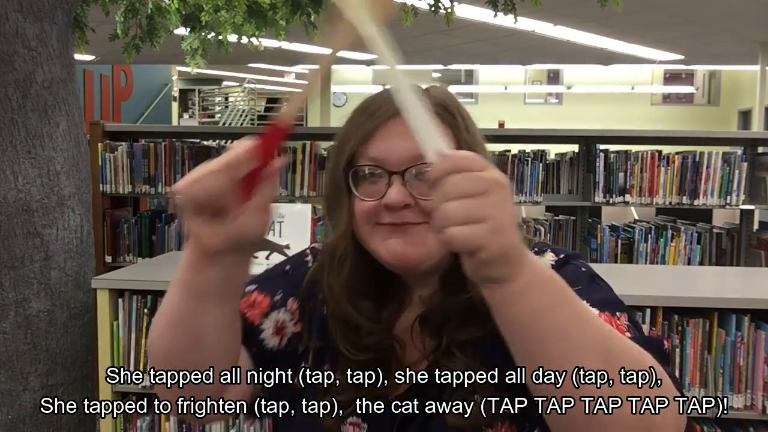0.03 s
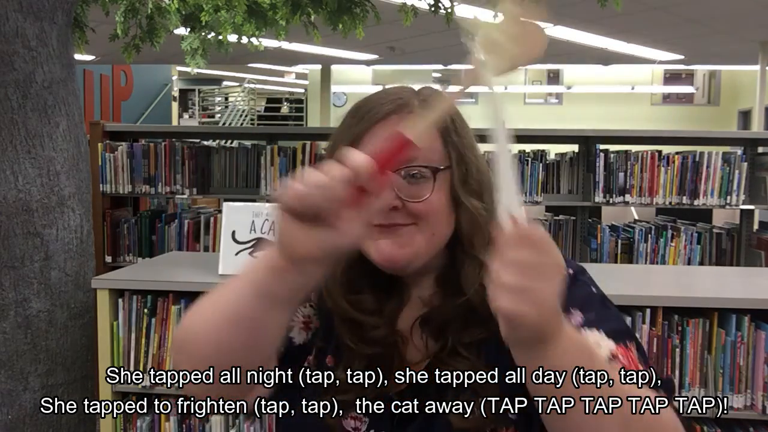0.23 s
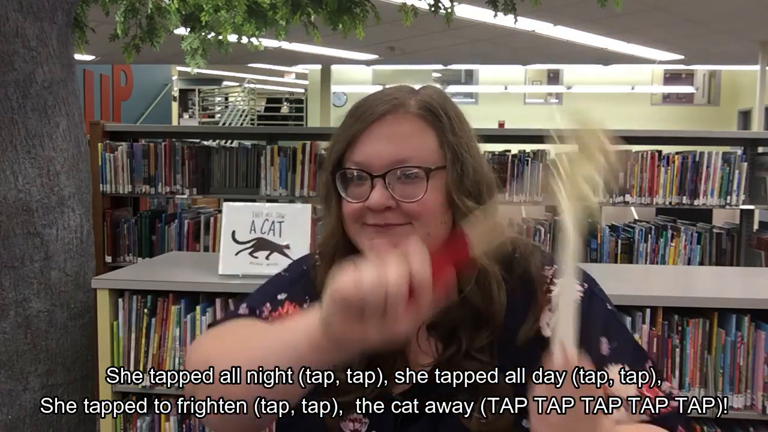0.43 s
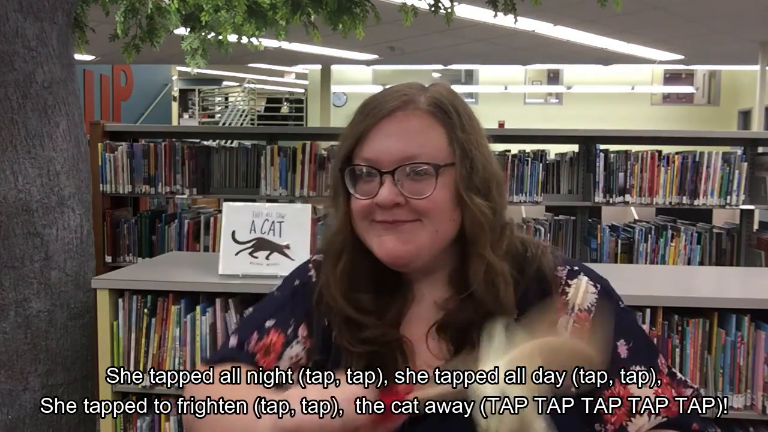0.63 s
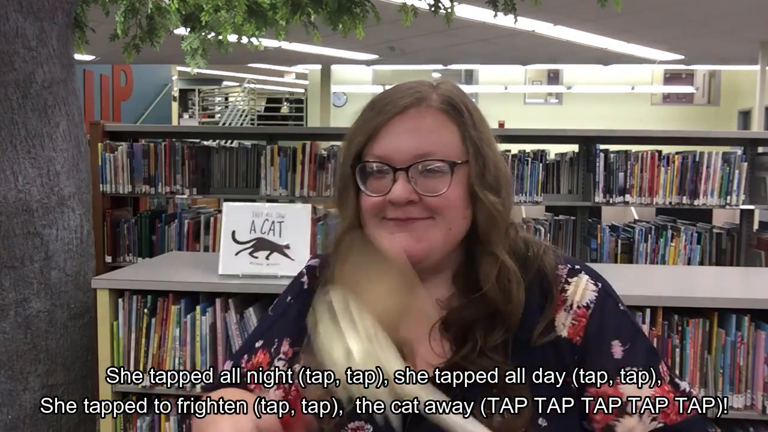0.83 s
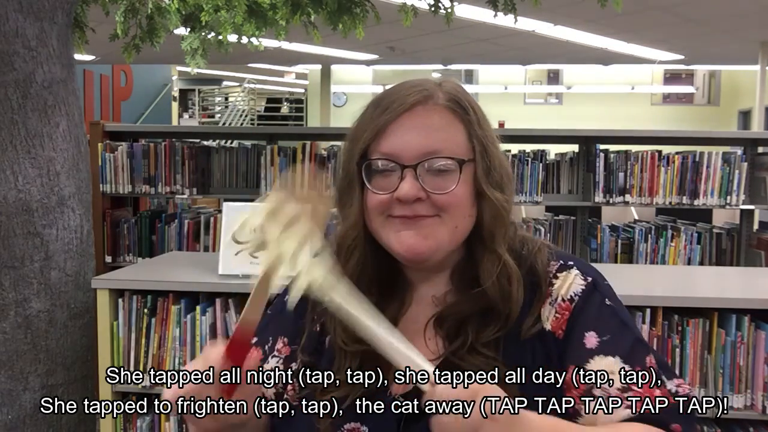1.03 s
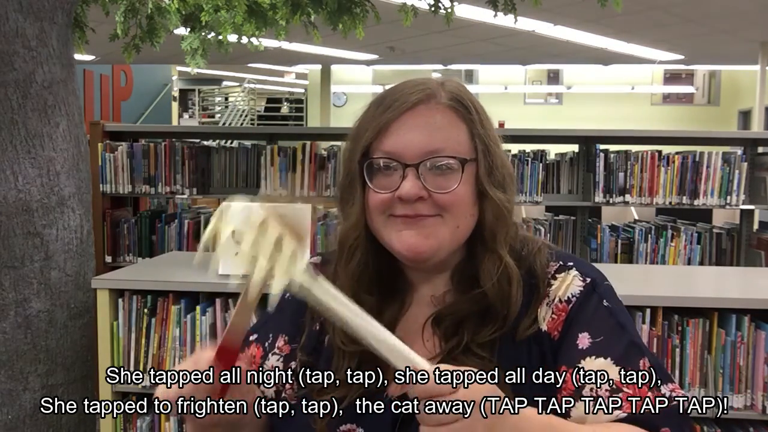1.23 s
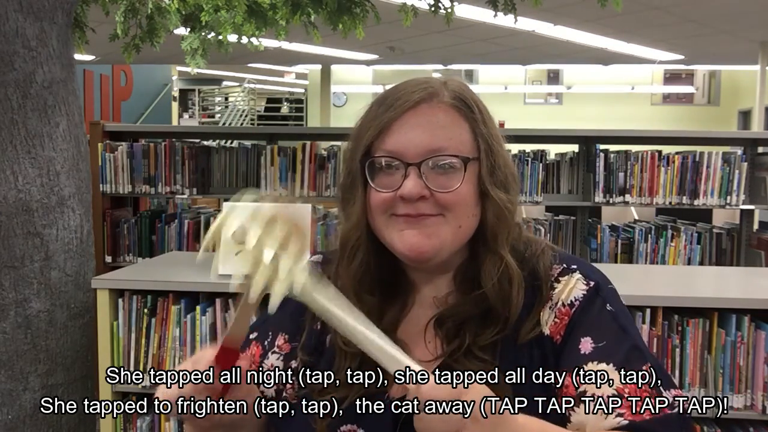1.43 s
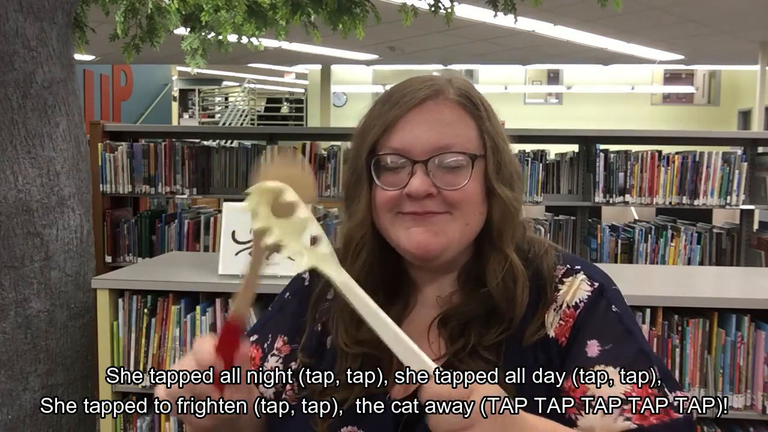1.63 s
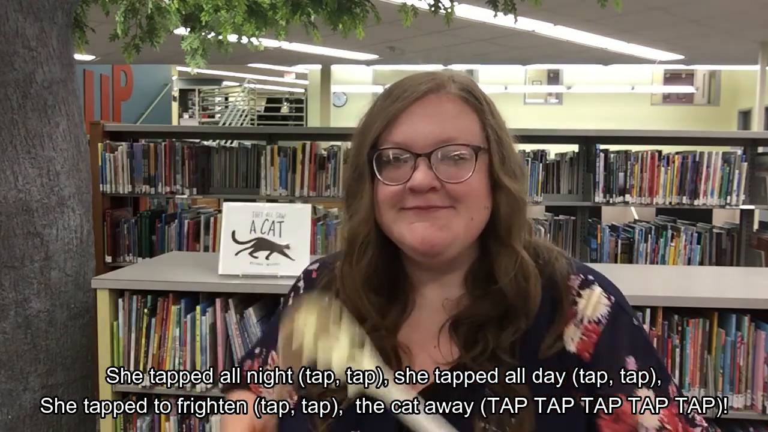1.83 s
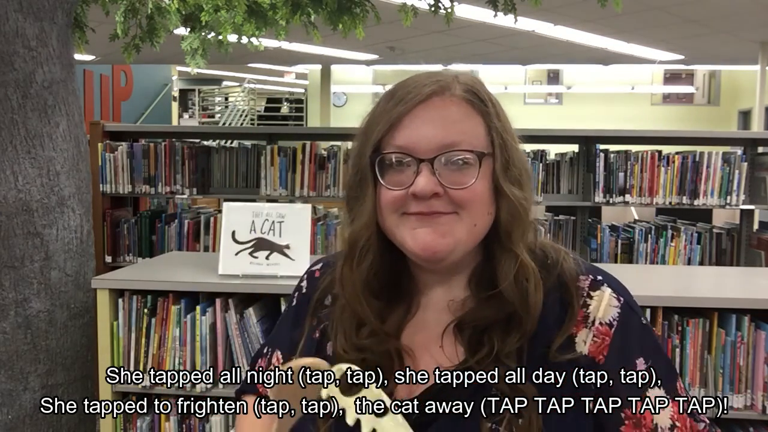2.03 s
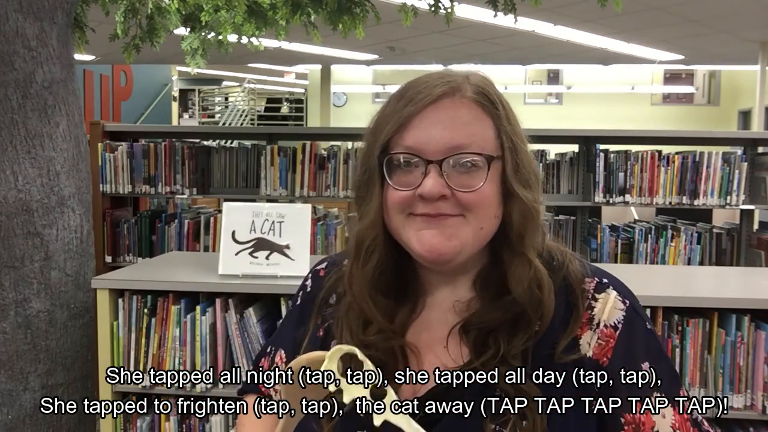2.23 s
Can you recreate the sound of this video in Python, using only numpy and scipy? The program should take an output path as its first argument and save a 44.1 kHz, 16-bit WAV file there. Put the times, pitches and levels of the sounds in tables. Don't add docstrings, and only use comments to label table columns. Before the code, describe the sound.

A wooden spoon and plastic spatula clack together in a quick run of sharp, dry knocks.

```python
import sys
import numpy as np
from scipy import signal
from scipy.fft import rfft, irfft
from scipy.io import wavfile

SR = 44100
rng = np.random.default_rng(int(sys.argv[2]) if len(sys.argv) > 2 else 0)


def put_to_file(sound):
    columns = np.atleast_2d(sound).T
    safe = np.clip(columns, -1, 1)
    whole_steps = np.round(safe * 32767)
    wavfile.write(sys.argv[1], SR, whole_steps.astype(np.int16))


def nominal_scale(level):
    x = np.asarray(level, float) / 20
    return 10 ** x


N = 100151
PAD = 4410


def band(x, lo_hz, hi_hz):
    return signal.sosfilt(signal.butter(2, [lo_hz, hi_hz], "band", fs=SR, output="sos"), x)


def fade(t, t60):
    return np.exp(-np.log(1000) * t / t60)


def add(out, s, x):
    i = int(s * SR) + PAD
    out[:, i:i + x.shape[-1]] += x[..., :out.shape[1] - i]


def shaped_noise(gain):
    x = irfft(rfft(rng.standard_normal(N)) * gain, N)
    return x / np.sqrt(np.mean(x ** 2))


# f/Hz, level/dB per Hz
HUSH_SPECTRUM = [(12, -39), (20, 7), (59, -6.5), (229, -28.5), (328, -28), (457, -42), (525, -40),
                 (1930, -54.5), (15000, -65)]


def ventilation():
    f = np.maximum(np.arange(N // 2 + 1) * SR / N, 1)
    hz, db = np.array(HUSH_SPECTRUM).T
    hush_db = np.interp(np.log(f), np.log(hz), db)
    hush = shaped_noise(nominal_scale(hush_db) * (f > 15))
    rumble = shaped_noise(1 / (1 + ((f - 37) / 13) ** 4))
    fan = shaped_noise(1 / (1 + ((f - 181.7) / 6) ** 2))
    return nominal_scale(-28.5) * hush + nominal_scale(-33.5) * rumble + nominal_scale(-52) * fan


# f/Hz, t60/s
ROOM_T60 = [(300, 0.42), (1000, 0.2), (2500, 0.18), (6000, .33), (14000, 0.075)]


def room(x):
    gap_s, rise_s, level_db = 0.0071, 0.0041, -19.5
    tail_db, tail_t60_s = -23.5, 0.95
    t = np.arange(SR) / SR
    hz, t60 = np.array(ROOM_T60).T
    echo = 0
    for f in 150 * 2. ** np.arange(7):
        early = fade(t, np.interp(np.log(f), np.log(hz), t60))
        tail = nominal_scale(tail_db) * fade(t, tail_t60_s)
        noise = band(rng.standard_normal(SR), f / np.sqrt(2), f * np.sqrt(2))
        echo = echo + noise * (early + tail)
    echo = echo * np.clip((t - gap_s) / rise_s, 0, 1)
    echo = echo / np.sqrt(np.sum(echo ** 2))
    return nominal_scale(level_db) * signal.fftconvolve(x, echo)[:len(x)]


# t/s, level/dB
TICKS = [(0.479, -50), (.667, -47), (.785, -41), (.9655, -41), (1.03, -49), (1.288, -42.5), (1.432, -47),
         (1.586, -40.5), (1.748, -40), (1.852, -50.5), (2.2705, -38)]


def ticks():
    out, t = np.zeros((1, N + PAD)), np.arange(600) / SR
    for s, db in TICKS:
        add(out, s, nominal_scale(db) * rng.standard_normal(len(t)) * fade(t, 0.017))
    return band(out[0], 5000, 9500)


# f/Hz, level/dB in the raised grip, level/dB in the crossed grip, t60/s
LOW_MODES = [(510, -5.5, -6.5, .02), (695, -7.5, -5.5, .02), (917, -13.5, -6.5, 0.018),
             (1255, -1, -1.5, 0.023), (1465, -7.5, -18.5, .02), (1683, -9.5, -5, 0.015)]
SPOON_SHAFT = [(2191, -9, -3.5, 0.016), (2305.6, 2.5, -7.5, 0.018), (2460, -16, 0, 0.016)]
SPATULA_BLADE = [(3008, -11.5, -1.5, 0.017), (3298, -1, -2.5, .028), (3736, -4.5, -12.5, 0.005),
                 (4333, -11.5, 0, .025)]
SPATULA_TINES = [(5773, -2, -8, .012), (6576, -1, -9, 0.0064), (6486, -0.5, 0.5, 0.013),
                 (7486, 1, -2.5, 0.01), (8232, -3.5, -2, 0.0099), (9210, -12, -2.5, 0.006),
                 (10760, -19.5, -33, .01), (12000, -34.5, -11, 0.0088)]
FAMILIES = (LOW_MODES, SPOON_SHAFT, SPATULA_BLADE, SPATULA_TINES)
FAMILY_DB = [
    -6.5,
    5.5,
    4.5,
    1,
]


def ring(family, s):
    scatter_db, detune = 2.5, .006
    t = np.arange(3000) / SR
    hz, raised_db, crossed_db, t60 = np.array(family).T[:, :, None]
    mode_db = raised_db if s < 1.1 else crossed_db
    t60 = np.minimum(t60, .017 * (1 + 3000 / hz / 2))
    spot, shift, sign = rng.standard_normal((3, len(family), 1))
    gain = np.sign(sign) * nominal_scale(mode_db + scatter_db * np.tanh(spot))
    modes = gain * np.sin(2 * np.pi * hz * (1 + detune * shift) * t) * fade(t, t60)
    return modes.sum(axis=0)


# low f/Hz, high f/Hz, level/dB, t60/s
CRACKS = [
    (270, 1380, -2.5, 0.025),
    (1670, 3200, 3.5, 0.0059),
    (2930, 3920, 10, 0.02),
    (5040, 9800, 5, 0.011),
]
# from t/s, then level/dB of low modes, shaft, blade, tines
FACING = [
    (-1, 26, 20.7, 25, 22.9),
    (.5, 21.9, 20, 16, 14),
    (1.1, 30.4, 29.9, 22, 21.84),
    (1.8, 32, 23, 25.4, 11.5),
    (2.0, 29, 26.6, 24, 27),
]


def contact(s, levels_db):
    t = np.arange(3000) / SR
    rings, cracks, knocks = 0, [], []
    sends_db = [row[1:] for row in FACING if row[0] <= s][-1]
    settings = zip(FAMILIES, CRACKS, levels_db, FAMILY_DB, sends_db)
    for family, (_, _, crack_db, crack_t60), blow_db, trim_db, send_db in settings:
        db = blow_db + trim_db
        rings = rings + nominal_scale(db) * ring(family, s)
        cracks.append(nominal_scale(db + crack_db) * rng.standard_normal(len(t)) * fade(t, crack_t60))
        knocks.append(nominal_scale(db + send_db) * (t == 0))
    return np.array([rings] + cracks + knocks)


# t/s, then level/dB into low modes, spoon shaft, spatula blade, tines
BOUNCES = [(.3866, -16.5, -16, -17, -17), (0.7237, -13.5, -34.5, -37, -49.5), (.8507, -14, -29, -55, -28),
           (0.9529, -15, -29, -30.5, -38.5), (0.983, -19.5, -34, -49, -41), (0.9948, -16, -39, -48, -43.5),
           (1.0137, -22.5, -32.5, -44, -40.5), (1.172, -15.5, -27, -35, -23), (1.174, -26.5, -25, -34, -25),
           (1.318, -11, -17, -29.5, -16.5), (1.472, -15.5, -28.5, -26.5, -22),
           (1.4902, -8, -26, -27, -19.5), (1.6321, -3.5, -15, -15, -11.5), (1.636, -20, -19, -20.5, -15),
           (1.642, -15.5, -21.5, -22.5, -21), (1.6433, -12, -22, -22, -17.5), (1.649, -14.5, -26, -30, -22),
           (1.656, -14.5, -32, -26, -24), (1.6882, -14, -25.5, -21.5, -23), (1.753, -49.5, -46, -41.5, -51),
           (1.939, -36, -47, -59.5, -57.5)]


def bounces():
    rows = np.zeros((9, N + PAD))
    for s, *levels_db in BOUNCES:
        add(rows, s, contact(s, levels_db))
    return signal.sosfilt(signal.butter(2, 9000, fs=SR, output="sos"), rows)


# t/s, then level/dB into low modes, spoon shaft, spatula blade, tines
BLOWS = [(.0857, -12.5, 0.5, -2, -6), (0.2327, -10.5, -5, -7.5, -17.5), (.3774, -1.5, -0.5, -6, -4),
         (0.5417, 3.5, -5, -4, -8.5), (0.6918, 2.5, -6, -6.5, -8), (0.8227, 0, -10.5, -15, -12.5),
         (0.8416, -4, -22, -19, -12.5), (1.1643, -4, -16, -14.5, -5), (1.3106, -2, -12, -13.5, -2.5),
         (1.4648, -2.5, -9.5, -15, 0.5), (1.6254, 3, -10, -1, 4), (1.8954, -8.5, -13.5, -13, -8.5),
         (2.136, -18, -24.5, -27.5, -35.5)]


def blows():
    rows = np.zeros((9, N + PAD))
    for s, *levels_db in BLOWS:
        add(rows, s, contact(s, levels_db))
    earlier_s, earlier_db = -0.099, 6
    add(rows, earlier_s, nominal_scale(earlier_db) * contact(earlier_s, BLOWS[0][1:]))
    return rows


def tools():
    rows = blows() + bounces()
    crack, knock = 0, 0
    for k, (lo_hz, hi_hz, _, _) in enumerate(CRACKS):
        sign = (-1) ** k
        crack = crack + sign * band(rows[1 + k], lo_hz, hi_hz)
        knock = knock + sign * band(rows[5 + k], lo_hz, hi_hz)
    near = rows[0] + crack
    return near + ticks(), nominal_scale(-8) * near + knock


def scene():
    direct, sent = tools()
    return ((direct + room(sent))[PAD:] + ventilation())[None]


def roll_off(x):
    return signal.sosfilt(signal.butter(12, 16510, fs=SR, output="sos"), x)


def record(dry):
    ceiling, knee = .93, 5
    limited = ceiling * dry / (1 + np.abs(dry) ** knee) ** (1 / knee)
    low_pass = signal.ellip(8, .2, 60, 15800, fs=SR, output="sos")
    return roll_off(signal.sosfilt(low_pass, limited))


dry = scene()
out = record(dry)
put_to_file(out)
```